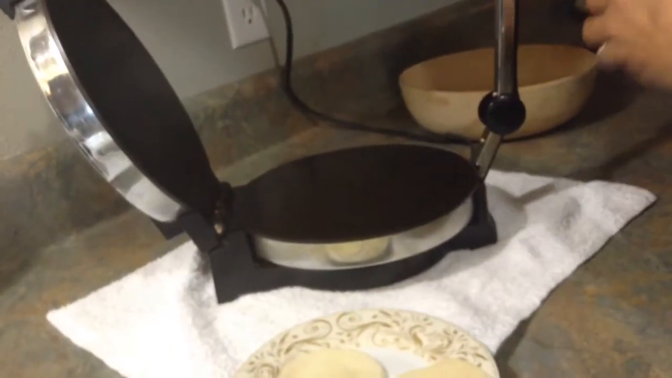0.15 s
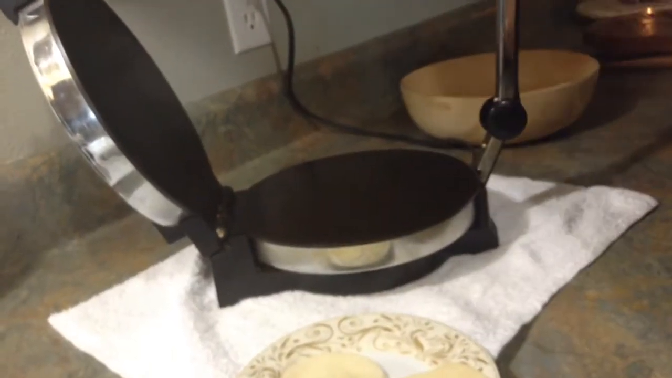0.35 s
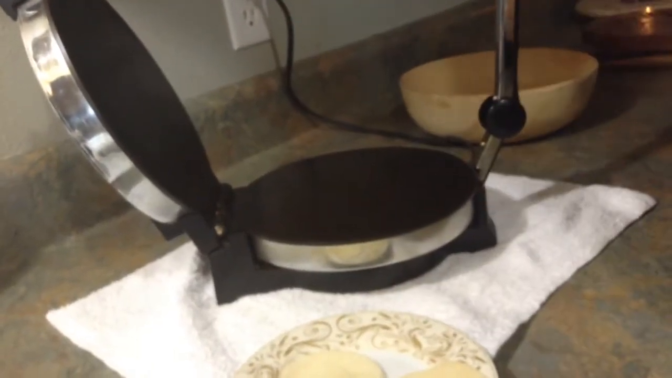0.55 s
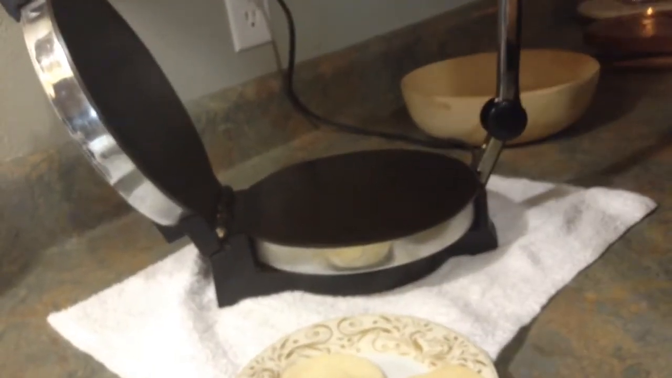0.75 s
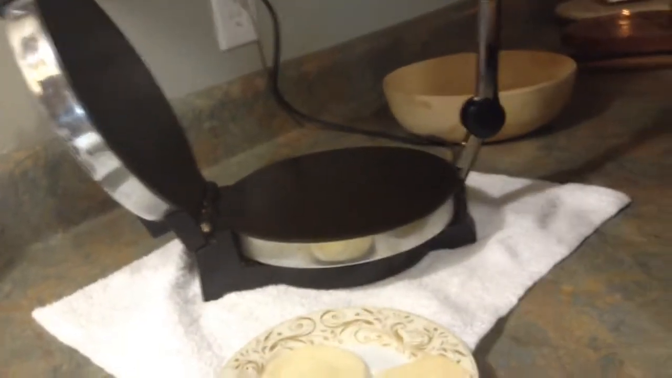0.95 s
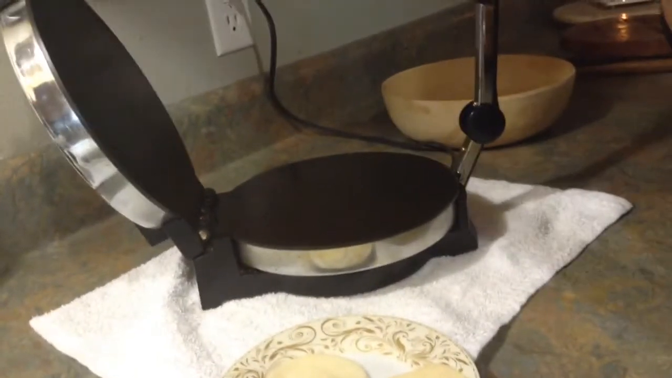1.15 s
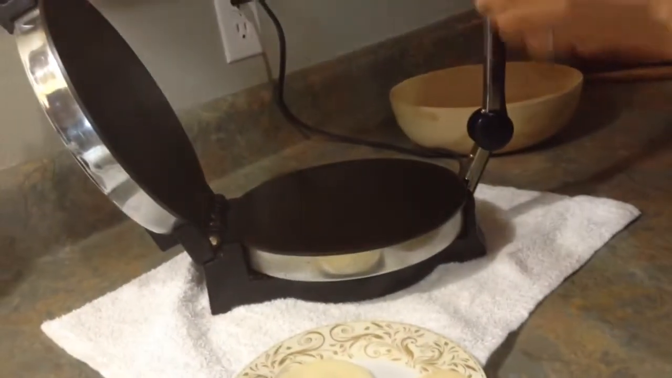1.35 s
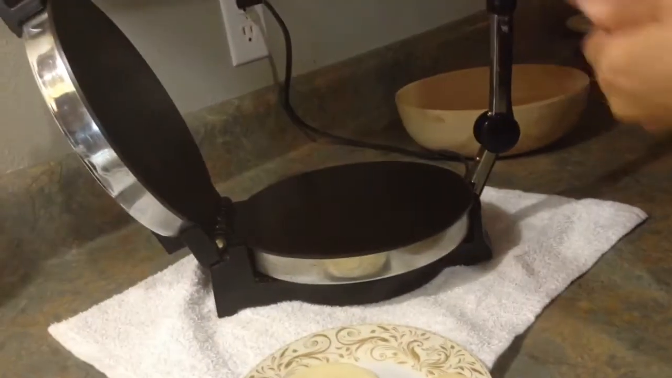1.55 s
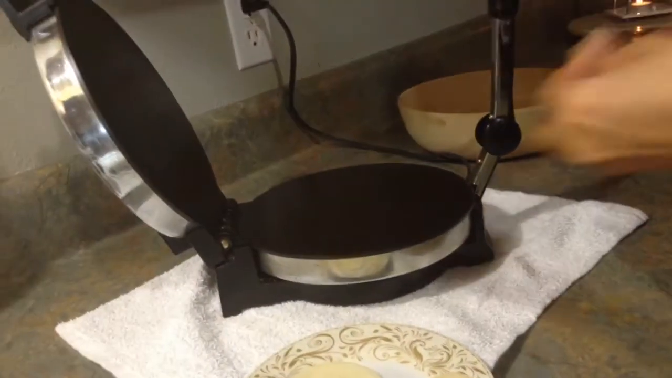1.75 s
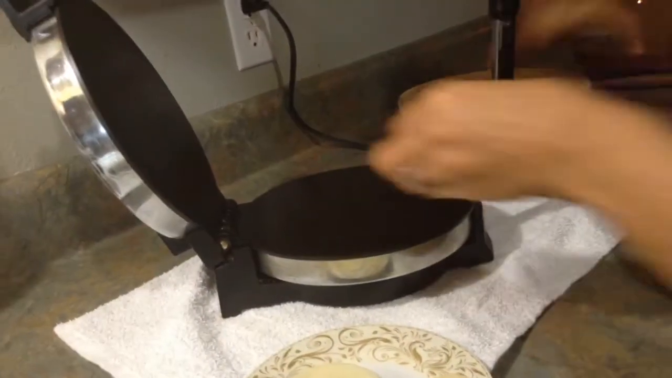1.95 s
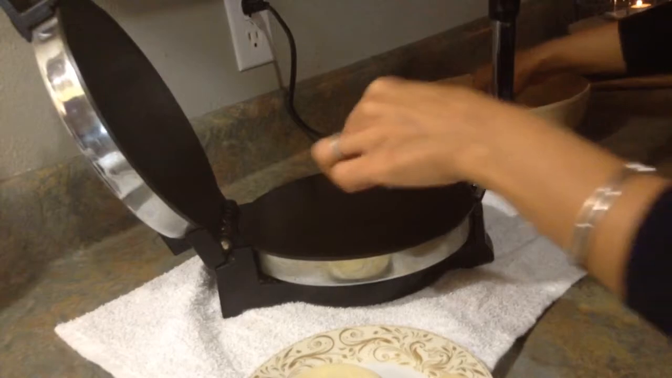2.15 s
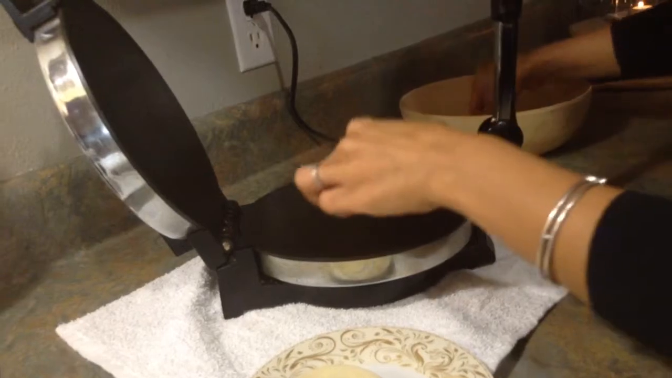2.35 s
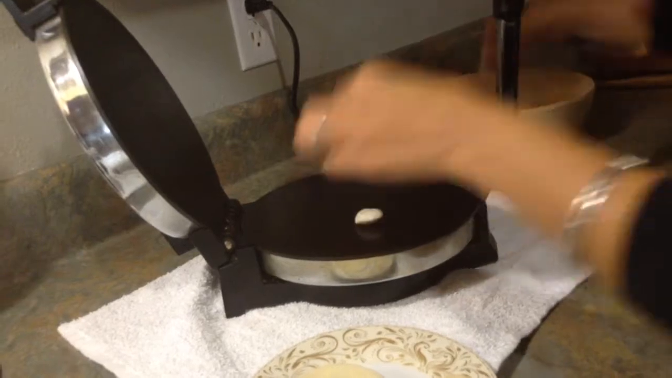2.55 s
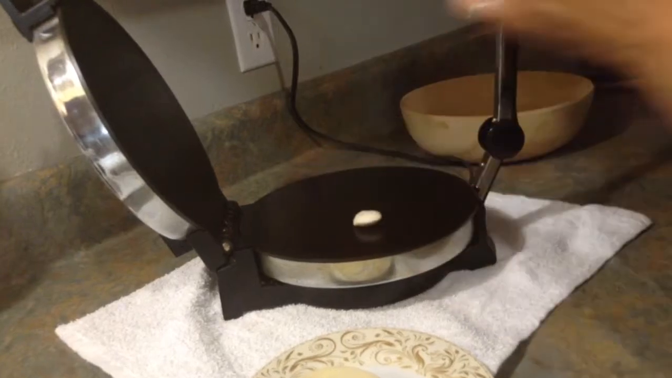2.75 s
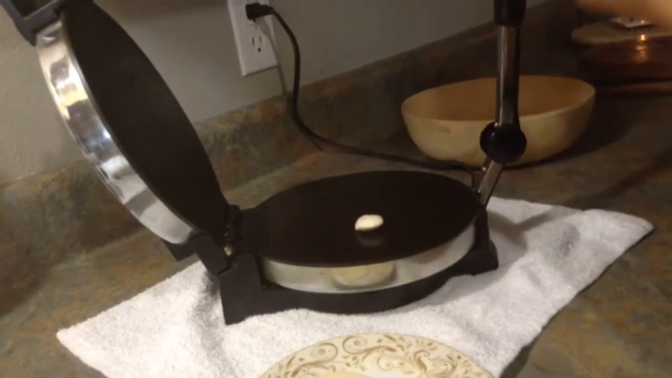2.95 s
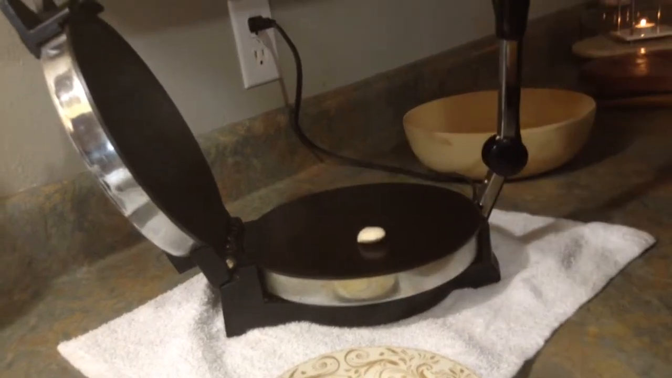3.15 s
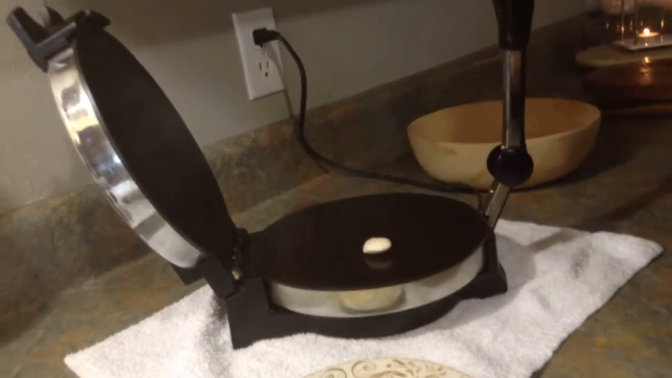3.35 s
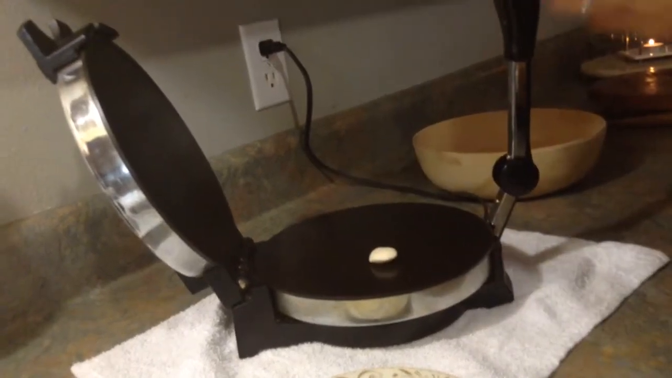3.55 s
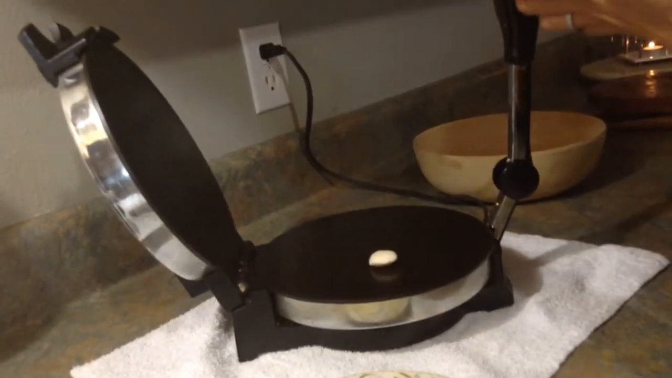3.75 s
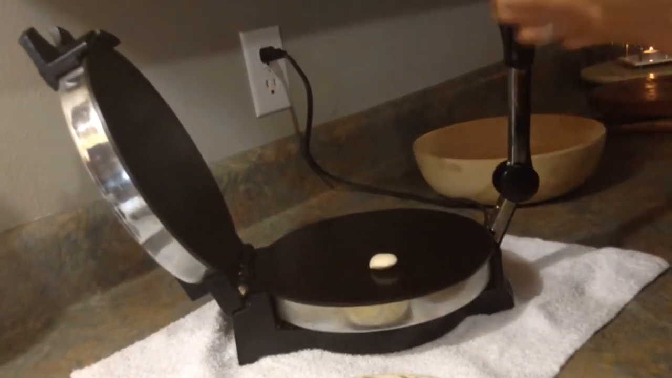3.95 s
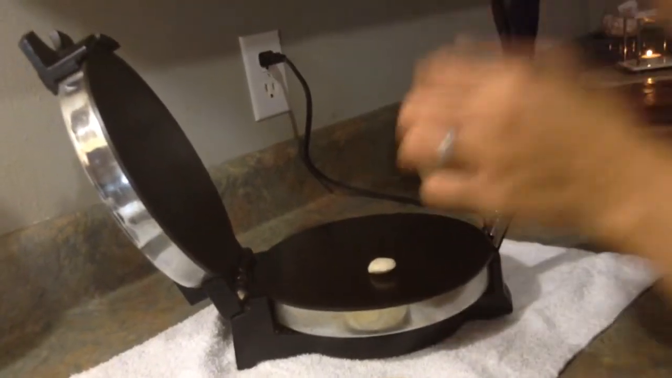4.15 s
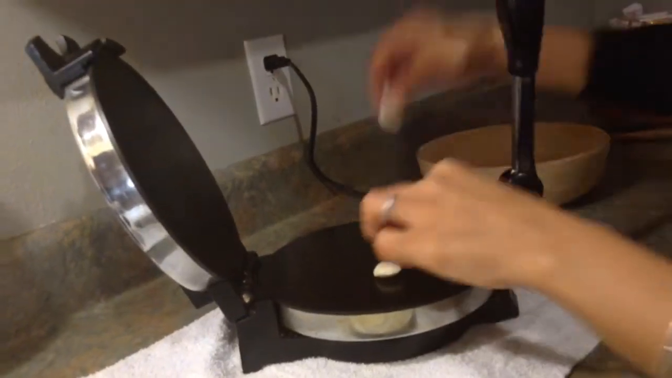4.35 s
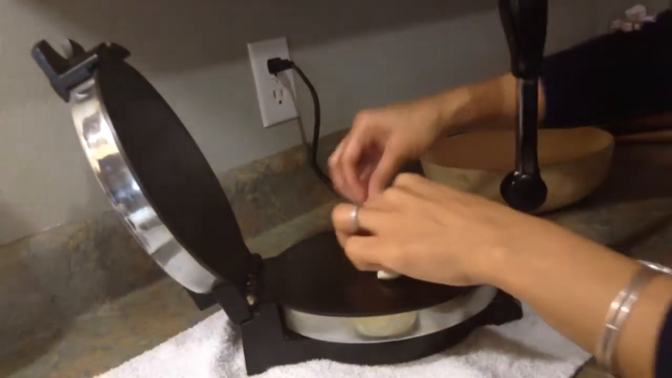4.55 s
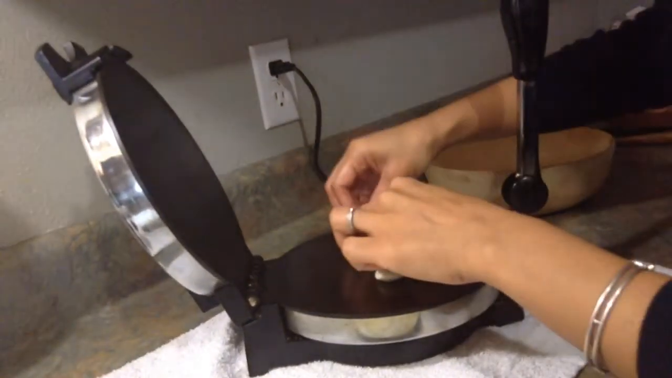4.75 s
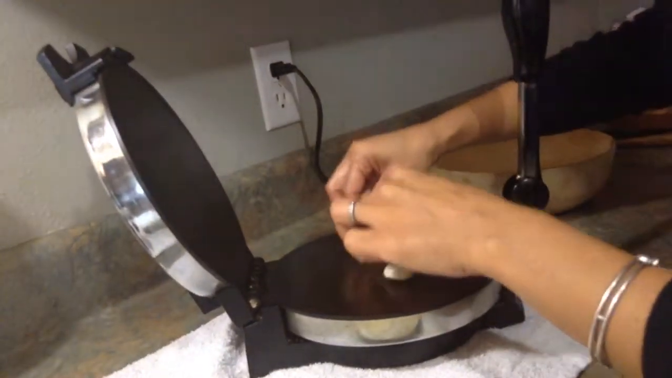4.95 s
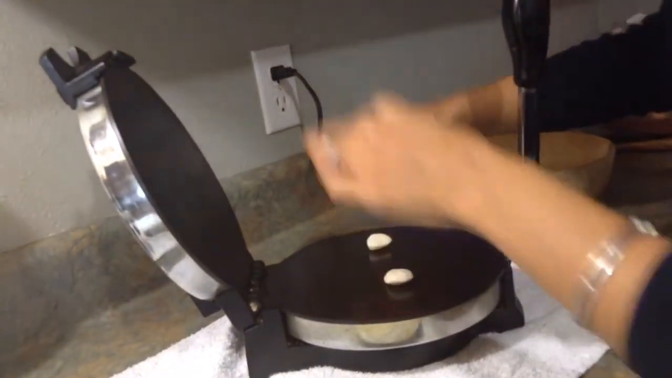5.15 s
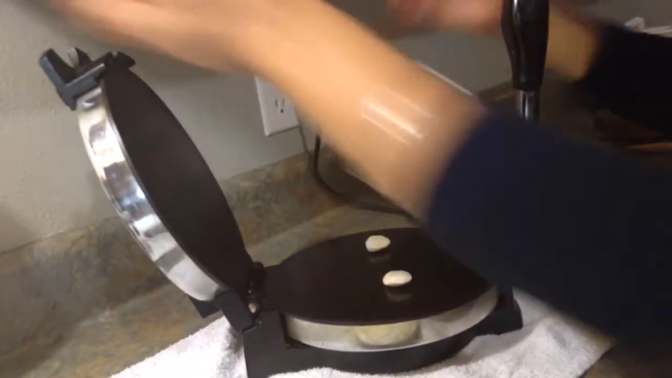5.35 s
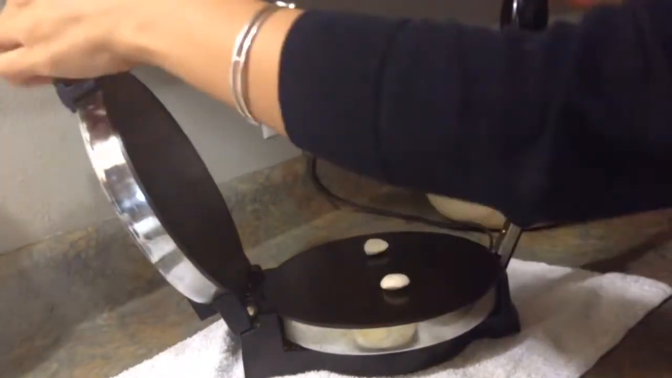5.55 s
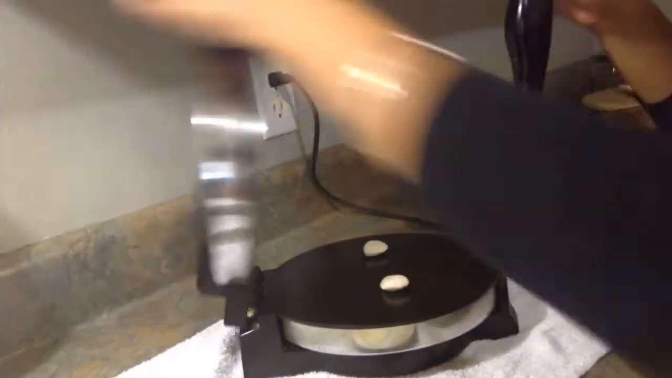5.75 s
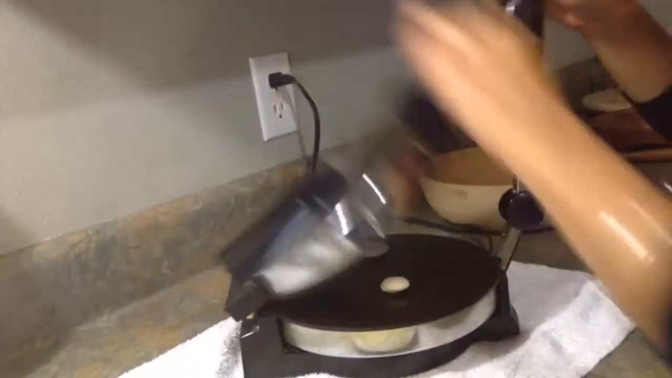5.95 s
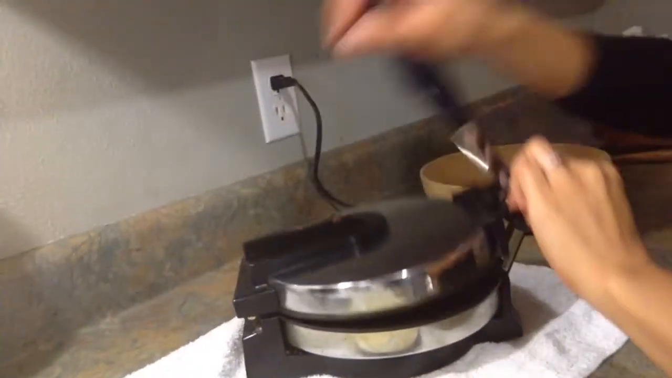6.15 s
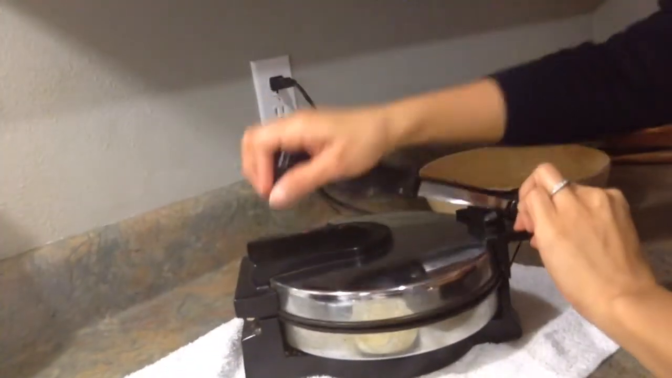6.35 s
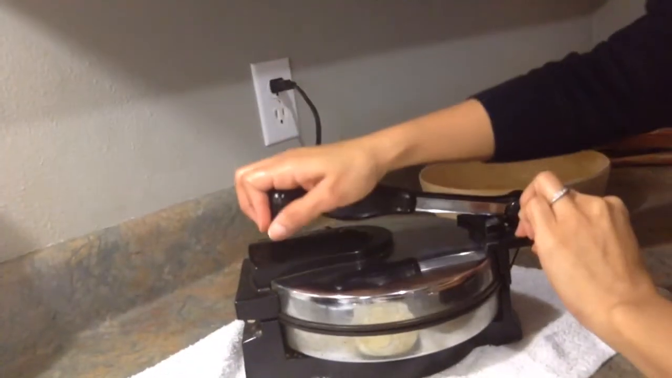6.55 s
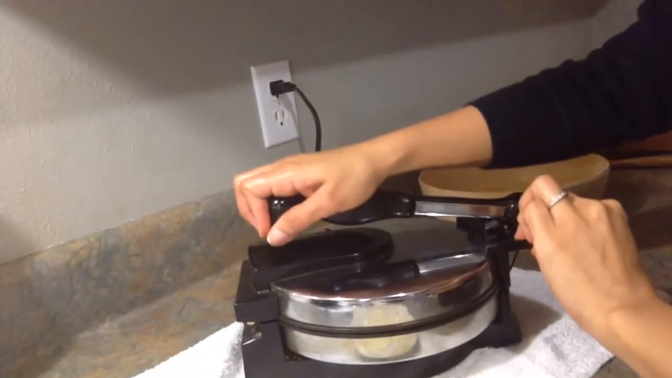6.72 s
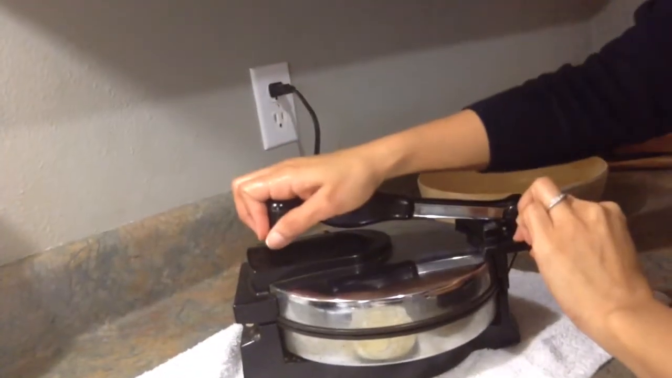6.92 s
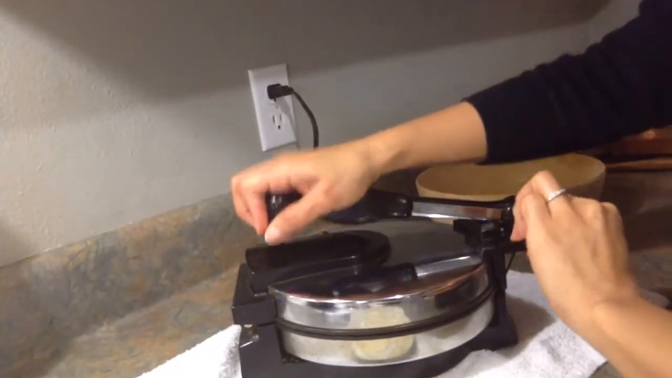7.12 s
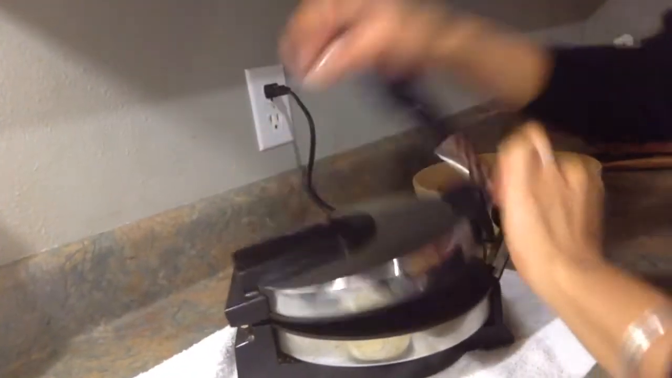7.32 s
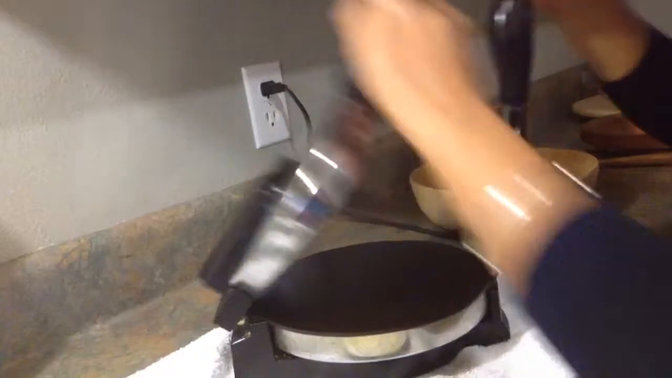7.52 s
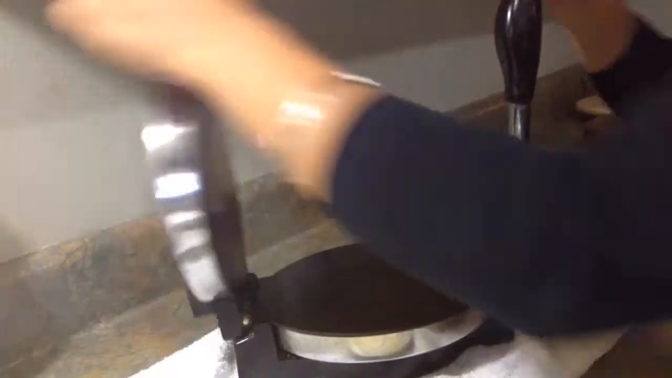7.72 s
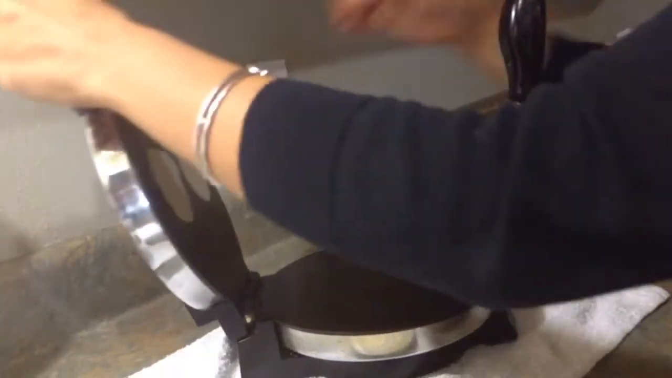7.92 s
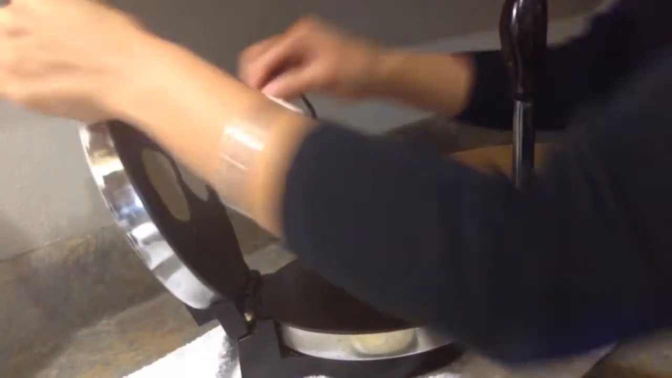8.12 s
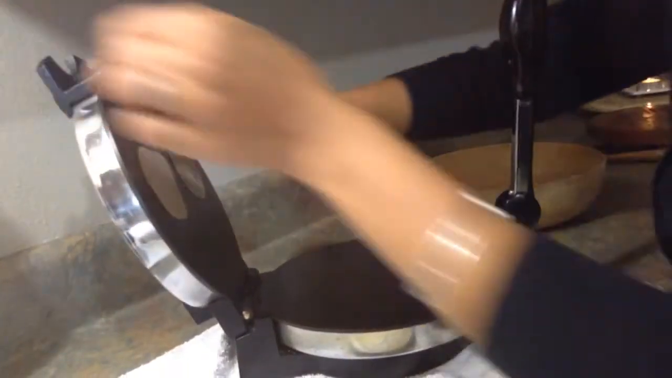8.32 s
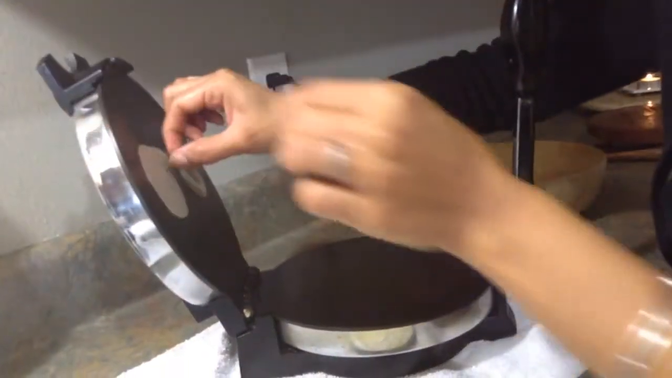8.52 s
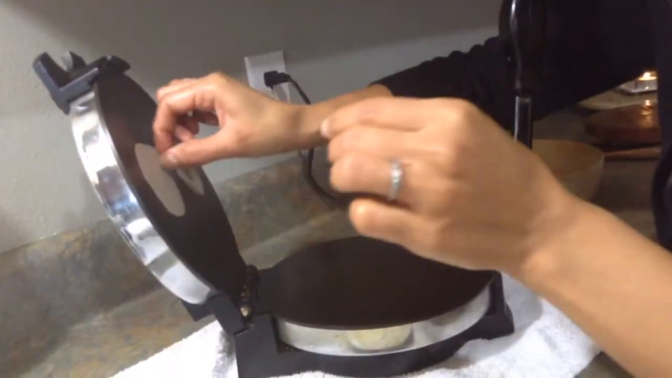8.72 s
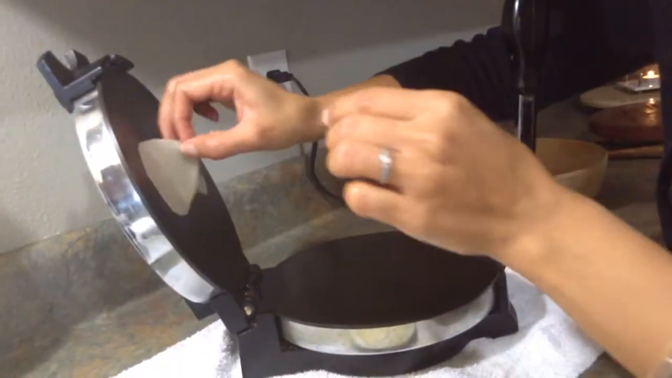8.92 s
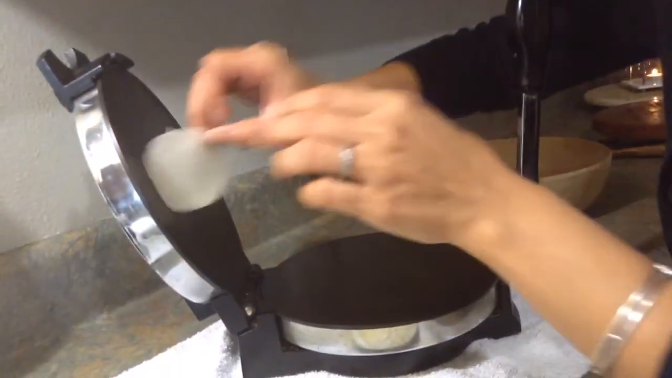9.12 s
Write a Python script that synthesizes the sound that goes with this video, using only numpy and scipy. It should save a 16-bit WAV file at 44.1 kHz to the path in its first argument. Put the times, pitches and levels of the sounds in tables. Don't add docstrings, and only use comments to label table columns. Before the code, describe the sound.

Palms roll dough with dry hissing strokes, then a hinged metal press clanks shut, its lever clicks, dough sizzles, and the lid knocks open.

```python
import sys
import numpy as np
from scipy import signal
from scipy.fft import rfft, irfft, next_fast_len
from scipy.io import wavfile
from scipy.ndimage import uniform_filter1d

SR = 44100
rng = np.random.default_rng(int(sys.argv[2]) if len(sys.argv) > 2 else 0)


def generate_wav(signal):
    frames = np.transpose(np.atleast_2d(signal))
    scaled = np.clip(frames, -1, 1) * 32767
    pcm = np.round(scaled).astype(np.int16)
    wavfile.write(sys.argv[1], SR, pcm)


def makeup_ratio(level_db):
    decades = np.asarray(level_db, float) / 20
    return 10 ** decades


N = 409233
T = np.arange(N) / SR

# (frequency [Hz], level [dB per Hz])
SKIN = [(880, 17), (1500, -2), (2530, -9.5), (3860, -5.5), (4520, -8), (5240, -14), (11000, -8),
        (12800, -6.5), (14900, -6), (15800, -6.5)]
# (frequency [Hz], level [dB], t60 factor [1])
PLATES = [(363.4, -14, 1.2), (460.6, -7.5, 1), (517, -14, 1.7), (607, -13, 1.5), (688, -12.5, 1.1),
          (758, -2.5, 2), (931, 3, 1.05), (1005, -2, 1.2), (1196, -12, 1.7), (1323, -5, 1.3),
          (1380, -0.5, 1.2), (1418, -1.5, 1.6), (1470, -4.5, 1.3), (1530, -8, 1.2), (1710, -14, 0.8),
          (1930, -10, .7), (2048, 1, 1.2), (2260, -7, 1.0), (2385, -4, .7), (2543, -7, 0.85),
          (2720, -1, .45), (3030, -12.5, .6), (3246, -10.5, 0.8), (3880, -16, 0.46), (4350, -14, .6)]


def evened(x):
    return x / np.sqrt(np.mean(x ** 2) + 1e-20)


def read(points, hz):
    f, value = np.transpose(points)
    return np.interp(np.log(hz + 1), np.log(f + 1), value)


def add(mix, s, sound):
    part = mix[round(s * SR):][:len(sound)]
    part += sound[:len(part)]


def curve(tables):
    s, *columns = np.transpose(sum(tables, []))
    inside = sum((T >= rows[0][0]) & (T < rows[-1][0] + 0.003) for rows in tables) > 0
    gate = uniform_filter1d(1. * inside, size=400)
    return [gate] + [np.interp(T, s, c) for c in columns]


def fade(t, t60):
    return np.exp(-np.log(1000) * t / t60)


def band(x, lo_hz, hi_hz):
    edges_hz = [lo_hz, min(hi_hz, SR / 2.1)]
    return signal.sosfilt(signal.butter(3, edges_hz, "band", fs=SR, output="sos"), x)


def resonate(x, hz, width):
    turn = np.exp(2j * np.pi * np.cumsum(hz * np.ones(len(x))) / SR)
    r = np.exp(-np.pi * width / SR)
    return 2 * (turn * signal.lfilter([1 - r], [1, -r], x / turn + 1e-18)).real


def hiss(spectrum, patchy_db, flicker_db):
    frames, hz = N // 128 + 5, np.fft.rfftfreq(512, 1 / SR)
    a, b, patches = rng.standard_normal((frames, 257, 3)).T
    patches = uniform_filter1d(patches, size=6, axis=0)
    patches = evened(uniform_filter1d(patches, size=12, axis=1))
    flicker = evened(uniform_filter1d(rng.standard_normal(frames), size=3))
    level_db = read(spectrum, hz)[:, None] + patchy_db * patches + flicker_db * flicker
    z = (a + 1j * b) * makeup_ratio(level_db)
    return evened(signal.istft(z, nperseg=512, noverlap=384)[1][:N])


def grit(per_s, spread_db):
    size = makeup_ratio(spread_db * np.minimum(rng.exponential(1, N), 5))
    sign = rng.choice([-1, 1], N)
    return evened(size * sign * (rng.random(N) < per_s / SR))


def burst(noise, lo_hz, hi_hz, t60):
    x = band(noise * fade(T[:len(noise)], t60), lo_hz, hi_hz)
    return x / abs(x).max()


def air():
    # (frequency [Hz], level [dB per Hz])
    room = [(29, -61), (60, -33), (95, -22), (134, -9), (188, -8), (257, -9), (300, -12), (530, -14),
            (837, -13), (2530, -20), (4410, -20), (13700, -21), (15800, -24)]
    # (time [s], level [dB])
    hum_levels = [
        (0, -80.5),
        (5.5, -77),
        (6.2, -89.5),
        (9.28, -95),
    ]
    room_db, hum_hz = -71.3, 240.5
    size = next_fast_len(N, True)
    hz = np.fft.rfftfreq(size, 1 / SR)
    tone = evened(irfft(rfft(rng.standard_normal(N), size) * makeup_ratio(read(room, hz)), size)[:N])
    drift, waver = (evened(uniform_filter1d(rng.standard_normal(N), size=n)) for n in (2500, 9000))
    crackle = evened(resonate(grit(per_s=40, spread_db=6), 6000, width=900))
    hum = np.sin(2 * np.pi * np.cumsum(hum_hz + 0.6 * waver) / SR)
    hum_db = np.interp(T, *np.transpose(hum_levels)) + 0.84 * waver
    return makeup_ratio(room_db + drift) * (tone + 0.057 * crackle) + np.sqrt(2) * makeup_ratio(hum_db) * hum


def kitchen(x):
    # (frequency [Hz], t60 [s])
    decay = [(150, 0.38), (500, .45), (1000, 0.47), (2000, 0.39), (4000, 0.23), (6500, 0.2), (12000, 0.29)]
    out = np.zeros(N)
    for k in range(3):
        taps = np.zeros(SR // 2)
        at = np.arange(250, len(taps) - 20, 20)
        taps[at + rng.integers(0, 20, len(at))] = rng.choice([-1., 1.], len(at))
        hz, t, z = signal.stft(taps, SR, nperseg=256)
        tail = signal.istft(z * makeup_ratio(-60 * t / read(decay, hz)[:, None]), SR, nperseg=256)[1]
        share = np.sqrt(2 / 3) * np.cos(2 * np.pi * 25 * T + k * np.pi / 3)
        out += signal.oaconvolve(share * x, tail / np.linalg.norm(tail))[:N]
    return out


def rocking():
    # (time [s], level [dB])
    shakes = [(4.0, -83), (5.59, -72.5), (5.72, -67), (6.0, -82), (6.43, -70.5), (6.72, -78.5), (7.2, -66),
              (7.36, -65), (9.27, -67.5)]
    lumps_db = np.interp(T, *np.transpose(shakes), left=-120)
    deep_db = np.interp(T, (5.3, 7.6), (-103, -75.5))
    noise = rng.standard_normal(N)
    lumps = resonate(noise, 150, width=16) + 0.65 * resonate(noise, 180.6, width=12.1)
    deep = resonate(resonate(noise, 76, width=10), 76, width=10)
    return makeup_ratio(lumps_db) * evened(band(lumps, 101.4, 300)) + makeup_ratio(deep_db) * evened(deep)


def thump(s, peak_db, hz, t60):
    t = T[:SR // 2]
    ring = np.sin(2 * np.pi * hz * t)
    ring += 0.4 * np.sin(2 * np.pi * hz * 0.66 * t)
    ring += 0.3 * np.sin(2 * np.pi * hz * 1.87 * t)
    rise = 1 - np.exp(-t / 0.004)
    return s, band(makeup_ratio(peak_db - 60 * t / t60) * rise * ring, 115, 900)


def bangle():
    # (frequency [Hz], level [dB], t60 [s], unused as the rattle sets the decay)
    modes = [(2230, -8, 0.076), (2620, -9, 5.0), (2940, -7, 1.2), (3470, -6, 0.33), (4590, -0.5, 0.42),
             (5400, -17, 0.077)]
    start_s, level_db, rattle_t60_s = 2.283, -51.5, 0.092
    t = T[:SR // 3]
    rattle = rng.standard_normal(len(t)) * makeup_ratio(-60 * t / rattle_t60_s)
    lines = sum(makeup_ratio(db) * evened(resonate(rattle, hz, width=70)) for hz, db, _ in modes)
    return start_s, makeup_ratio(level_db - 20.0) * lines


def bowl(s, peak_db):
    # (frequency [Hz], level [dB], t60 [s])
    modes = [(970, 1, 0.07), (1263, 3, 0.085), (1614, 7, 0.045), (1850, -18, 0.046), (2480, -6, .04),
             (2570, 2.5, 0.028), (3360, -17, .03)]
    t, noise = T[:SR // 5], rng.standard_normal(SR // 5)
    ring = sum(makeup_ratio(db - 60 * t / t60) * np.sin(2 * np.pi * hz * t) for hz, db, t60 in modes)
    ring = band(ring, 600, 4000)
    return s, makeup_ratio(peak_db) * (ring / abs(ring).max() + 0.59 * burst(noise, 1030, 3130, 0.11))


def tick(s, peak_db, hz, crack_db, t60):
    noise = rng.standard_normal(SR // 5)
    near = burst(noise, hz / 1.2, hz * 1.2, t60)
    wide = burst(noise, hz / 2.2, hz * 2.2, 0.6 * t60)
    crack = burst(noise, 5200, 24300, 0.39 * t60)
    return s, makeup_ratio(peak_db) * (0.5 * near + wide + makeup_ratio(crack_db + 8) * crack)


def snap(s, peak_db, lo_hz):
    return s, makeup_ratio(peak_db) * burst(rng.standard_normal(SR // 20), lo_hz, 18000, 0.0052)


def whistle(s, db, hz, width, half):
    t = np.arange(-3 * half, 3 * half, 1 / SR)
    pitch_hz = np.interp(t, (-1.5 * half, 1.5 * half), hz)
    fuzz = resonate(resonate(rng.standard_normal(len(t)), pitch_hz, width), pitch_hz, 2 * width)
    return s - 3 * half, makeup_ratio(db) * np.exp(-(t / half) ** 2) * evened(fuzz)


def squeak(s, db, hz, width, half):
    return whistle(s, db, (hz, hz), width, half)


def glide(s, db, from_hz, to_hz, half):
    return whistle(s, db, (from_hz, to_hz), 0.2 * (from_hz + to_hz) / 2, half)


def brushes():
    # (time [s], hiss level [dB], body level [dB], half length [s])
    strokes = [(0.322, -59.5, -68, 0.047), (1.028, -61.5, -70.5, 0.028), (1.112, -59.5, -72.5, 0.031),
               (1.275, -63, -97, 0.028), (1.57, -69, -69.5, 0.045), (2.288, -62, -73, 0.01),
               (2.857, -63, -69, 0.036), (2.907, -54.5, -72, 0.027), (3.018, -65, -68.5, 0.073),
               (3.59, -57, -66, 0.038), (3.687, -60, -75, 0.042), (3.841, -56.5, -73, 0.05),
               (4.102, -67, -78, 0.031), (4.651, -66, -74, 0.018), (4.81, -58, -71, 0.011),
               (4.88, -74, -74, 0.012), (5.327, -70.5, -76, 0.18), (8.872, -73, -68.5, 0.037),
               (9.066, -67.5, -58.5, 0.034)]
    slide, out = hiss(SKIN, patchy_db=2.0, flicker_db=2.5), np.zeros(N)
    top, body = evened(band(slide, 5600, 23000)), evened(band(slide, 1850, 5670))
    for s, hiss_db, body_db, half in strokes:
        at = slice(max(round((s - 3 * half) * SR), 0), round((s + 3 * half) * SR))
        swell = np.exp(-((T[at] - s) / half) ** 2)
        out[at] += swell * (makeup_ratio(hiss_db) * top[at] + makeup_ratio(body_db) * body[at])
    return out


def palms():
    # (time [s], pressure level [dB], palm cavity [Hz])
    rolls = [
        [(0.45, -81, 2860), (0.51, -41, 4553), (0.556, -40, 5200), (0.63, -38, 4840), (0.674, -35, 3920),
         (0.774, -41, 4690), (0.824, -35, 4590), (0.862, -48, 3570), (0.95, -74, 4260)],
        [(3.04, -60, 4190), (3.064, -55, 4930), (3.074, -43, 4970), (3.18, -36.5, 5300), (3.236, -37.5, 4060),
         (3.318, -44.5, 4530), (3.368, -40.5, 3950), (3.414, -43.5, 4510), (3.5, -70.5, 4270)],
    ]
    cup_db, cup_db_per_octave, cup_hz = -19, -12, 4700
    on, hiss_db, cavity_hz = curve(rolls)
    body_db = hiss_db + cup_db + cup_db_per_octave * np.log2(cavity_hz / cup_hz)
    slide = hiss(SKIN, patchy_db=1.8, flicker_db=0.7) + 0.1 * grit(per_s=4000, spread_db=1.2)
    cavity = resonate(rng.standard_normal(N), cavity_hz, width=650)
    cavity = resonate(cavity, cavity_hz, width=1600)
    body = 0.89 * evened(band(band(slide, 3060, 5450), 1800, 9300))
    body += 0.99 * evened(band(cavity, 2160, 9000))
    return on * (makeup_ratio(hiss_db) * evened(band(slide, 4930, 15000)) + makeup_ratio(body_db) * evened(body))


def sizzle():
    # (frequency [Hz], level [dB per Hz])
    steam = [(1470, -18.5), (2500, -12.5), (2870, -2), (4190, 3), (4930, -1), (6360, -5.5), (7770, 0),
             (9350, -6), (11000, -7), (11600, -22), (12400, -14), (13000, -4), (14600, -5.5), (15400, -12),
             (15800, -19)]
    start_s, build_s, lift_s = 6.15, 0.22, 7.28
    start_db, build_db, thin_db_per_s, stop_db_per_s = -53.5, -5, -12, -110
    t = T - start_s
    level_db = start_db + build_db * np.clip(1 - t / build_s, 0, 1)
    level_db += thin_db_per_s * np.maximum(t - build_s, 0)
    level_db += stop_db_per_s * np.maximum(T - lift_s, 0)
    pops = evened(band(grit(per_s=600, spread_db=4), 2500, 10500))
    leak = evened(hiss(steam, patchy_db=2.0, flicker_db=1.8) + 0.22 * pops)
    return np.clip(t / 0.012, 0, 1) * makeup_ratio(level_db) * leak


def hinge():
    # (time [s], length [s], rub level [dB], bright part relative level [dB])
    swings = [(5.522, 0.48, -69.5, 1.5), (6.259, 0.54, -61.5, -4), (6.972, 0.537, -65.5, 3.5),
              (7.269, 0.47, -67.5, -4), (7.871, 0.437, -66.5, -10.5), (8.6, 1, -74, -12.5)]
    rest = (8.18, 0.5, -72, -10)
    push_s, slow_db, halt_s = 0.065, -1.5, 0.017
    slips = (rng.standard_normal(N) + 0.3 * grit(per_s=900, spread_db=3))[:SR]
    plates = sum(makeup_ratio(0.88 * db) * resonate(slips, hz, width=220) for hz, db, _ in PLATES)
    body, bright = evened(band(plates, 340, 1800)), evened(band(plates, 1900, 5200))
    out, t = np.zeros(N), T[:SR]
    for start, length, rub_db, bright_db in swings + [rest]:
        speed = np.clip(t / push_s, 0, 1) * makeup_ratio(slow_db * t / length)
        speed = speed * np.clip((length - t) / halt_s, 0, 1)
        rub = np.roll(body + makeup_ratio(bright_db) * bright, rng.integers(SR))
        add(out, start, makeup_ratio(rub_db) * speed * rub)
    return out


def creak(s, peak_db, lo_hz):
    noise = rng.standard_normal((2, SR // 20))
    click = 1.1 * burst(noise[0], lo_hz, 18000, 0.002) + 0.12 * burst(noise[1], lo_hz, 15800, 0.028)
    return s, makeup_ratio(peak_db) * (click - resonate(click, 11700, width=900))


def blow(s, peak_db, body_db, edge_db, crack_db, t60, rings=0.59, luck_db=2.2, crack_hz=9000, thud_hz=430):
    linger_db, linger = -27, 3.5
    clatter_db, clatter = -21, 4.5
    t, noise = T[:SR // 5], rng.standard_normal(SR // 5)
    ring = np.zeros(len(t))
    for (hz, db, k), (a, b, c, d) in zip(PLATES, rng.standard_normal((len(PLATES), 4))):
        decay = fade(t, t60 * k) + makeup_ratio(linger_db) * fade(t, linger * t60 * k)
        mode = np.sin(2 * np.pi * hz * t + 0.3 * b)
        twin = 0.3 * np.sin(2 * np.pi * hz * (1 + 0.04 * c) * t + d)
        ring += makeup_ratio(db + luck_db * a) * decay * (mode + twin)
    ring *= 1 - np.exp(-t / 0.00071)
    low, high = band(ring, 0.7 * thud_hz, 1750), band(ring, 1750, 5200)
    knock_top_hz = np.interp(peak_db + edge_db, (-55.5, -24.5), (3400, 4300))
    thud = burst(noise, thud_hz, 1800, t60)
    knock = burst(noise, 1800, knock_top_hz, 0.8 * t60)
    crack = burst(noise, 5000, crack_hz, 0.6 * t60)
    crack = crack - resonate(crack, 11500, width=2000)
    rattle = burst(noise[::-1], 1.4 * thud_hz, 2600, clatter * t60)
    body = rings * low / abs(low).max() + 0.5 * thud + makeup_ratio(clatter_db) * rattle
    edge = 0.82 * rings * high / abs(high).max() + 0.59 * knock
    sound = makeup_ratio(body_db) * body + makeup_ratio(edge_db) * edge + makeup_ratio(crack_db - 0.5) * crack
    return s, makeup_ratio(peak_db + 11.5) * sound


def slip(s, level_db, body_db, crack_db):
    return blow(s, level_db, body_db, 0, crack_db, t60=0.046, rings=0.26, luck_db=4.5,
                crack_hz=15500, thud_hz=720)


def clank(s, level_db, edge_db, crack_db, t60):
    return blow(s, level_db, 0, edge_db, crack_db, t60)


def scene():
    # (time [s], peak level [dB], pitch [Hz], t60 [s])
    thumps = [(0.638, -50, 420, 0.025), (2.253, -57.5, 166.4, 0.086), (5.528, -45, 189.5, 0.085),
              (5.572, -46.5, 157, 0.17), (5.621, -52, 135, 0.12), (5.847, -60, 153, 0.2),
              (6.239, -34.5, 249, 0.11), (7.203, -33.5, 241, 0.046), (7.372, -38.5, 160, 0.11),
              (7.397, -56, 162, 0.12), (7.515, -44, 232, 0.11), (7.878, -31, 165, 0.048),
              (7.937, -56, 188, 0.11), (9.172, -55, 170, 0.17), (9.247, -49, 190, 0.1)]
    # (time [s], peak level [dB])
    knuckles = [(0.466, -42.5), (1.742, -47), (2.809, -49), (3.828, -50.5), (4.822, -52.5)]
    # (time [s], peak level [dB], pitch [Hz], crack relative level [dB], t60 [s])
    ticks = [(0.227, -60, 7300, -11, 0.087), (0.64, -46.5, 2200, -20, 0.02), (3.855, -53, 4560, 5, 0.0097),
             (1.589, -47.5, 3950, -13, 0.038), (1.597, -51, 2100, -20, 0.036), (1.649, -61, 5940, -6, 0.05),
             (2.259, -50.5, 815, -35, 0.12), (2.283, -49.5, 1070, -25, 0.18),
             (2.753, -54.5, 3470, 6, 0.049), (2.856, -37, 4340, -7.5, 0.028),
             (3.053, -43, 2440, -14, 0.067), (3.073, -38, 7600, -8, 0.03), (3.171, -43, 5390, -12, 0.055),
             (4.185, -61, 3140, 5.5, 0.035), (4.547, -57, 7540, 10.5, 0.024),
             (5.357, -55, 1300, -22, 0.024), (9.055, -62, 3640, -13, 0.038), (9.126, -48, 2080, -25, 0.025),
             (9.082, -49, 3500, -14, 0.014), (3.012, -59, 4000, -3, 0.012)]
    # (time [s], peak level [dB], lowest frequency [Hz])
    snaps = [(2.708, -51, 2500), (4.607, -56, 6000), (4.646, -47, 7000), (4.652, -48, 6000),
             (4.803, -53, 6000), (4.809, -37, 5000), (4.878, -48, 2500), (5.357, -46, 1000),
             (2.856, -38, 1500), (3.073, -40, 5000), (3.172, -42, 2500)]
    # (time [s], level [dB], pitch [Hz],
    # width [Hz], half length [s])
    squeaks = [(.567, -49, 5450, 390, 0.014), (.634, -48.5, 5250, 400, 0.014),
               (0.83, -60, 5340, 300, 0.012), (3.862, -70, 2900, 150, 0.011), (3.864, -73, 4440, 208, .012),
               (4.05, -75, 4500, 200, 0.0092), (4.467, -74, 2820, 250, 0.014),
               (4.465, -73.5, 4450, 324.1, .016), (2.752, -69, 3580, 900, .012),
               (0.568, -59.5, 1620, 340, 0.023), (0.641, -58, 750, 400, 0.0038),
               (0.692, -50, 3900, 300, 0.012), (3.11, -63, 1500, 260, 0.022),
               (3.155, -64, 1620, 260, 0.018), (6.87, -70, 469, 90, .06), (1.262, -54, 12100, 700, 0.013),
               (6.933, -43, 6520, 60, 0.0044), (6.185, -66, 1330, 200, 0.025),
               (6.168, -63, 2150, 350, 0.014), (6.198, -58, 2250, 400, 0.012),
               (6.231, -66, 300, 200, 0.004), (7.07, -51, 1013, 64.8, 0.0068),
               (7.083, -45, 3400, 198, 0.0047), (7.41, -47, 755, 90, 0.013), (7.44, -58, 750, 90, 0.02),
               (7.53, -59, 730, 110, .04)]
    # (time [s], level [dB], start pitch [Hz], end pitch [Hz], half length [s])
    glides = [(0.677, -50, 3200, 4000, 0.02), (0.795, -57, 3300, 2000, 0.014),
              (0.82, -59, 2000, 2100, 0.015), (0.855, -63, 2000, 1100, 0.012),
              (3.24, -56, 3900, 3100, 0.015), (3.365, -55, 3600, 2000, 0.02), (3.4, -64, 1800, 1000, 0.015),
              (3.175, -58, 3600, 2600, 0.01), (3.23, -50, 6100, 6600, 0.045),
              (3.13, -53, 5200, 5400, 0.015), (3.097, -52, 7100, 6800, 0.01)]
    # (time [s], peak level [dB], lowest frequency [Hz])
    creaks = [(6.655, -45, 2500), (6.702, -45, 3000), (6.871, -23, 3000), (6.898, -29.5, 2500),
              (6.916, -24.5, 2500), (6.929, -26.5, 3000), (6.963, -38, 3000)]
    # (time [s], edge level [dB], body relative level [dB], crack relative level [dB])
    slips = [(6.17, -60, -34, 3), (6.381, -39, -11, 7), (6.634, -36.5, -5.5, 0), (6.693, -48.5, 1.5, -27),
             (6.723, -56, 4, -20), (6.73, -57, 4, -20), (6.739, -51.5, -8, 9), (6.804, -35, -3, 3.2),
             (6.847, -33.5, -3.5, -3), (7.068, -46, -11, -5.5)]
    # (time [s], body level [dB], edge relative [dB], crack relative [dB], ring t60 [s])
    blows = [(5.528, -52, -9, -31, 0.075), (5.57, -52, -4.5, -27, 0.088), (5.619, -54, -8, -37, .055),
             (5.737, -74.5, 13.5, -6, 0.052), (5.837, -61, 3, -3, 0.054), (5.872, -77, 11, -12, 0.054),
             (6.238, -26, 5.5, -16, 0.038), (6.2424, -30.5, -3, -22, 0.036), (6.2495, -34, -6, -20, 0.045),
             (6.2545, -37, -6, -28, 0.04), (6.268, -49, -3, -18, 0.05), (6.281, -51, -2, -16, 0.05),
             (6.296, -57, 2, -13, .05), (7.08, -50, -2.5, -2.5, 0.19), (7.134, -47, -4, -12, 0.042),
             (7.204, -31, 0.5, -17.5, 0.035), (7.2072, -32, -3, -19, 0.042), (7.219, -45, 0, -20, 0.04),
             (7.229, -46, 0, -20, 0.04), (7.262, -52, 2, -12, 0.04), (7.273, -54, 3, -8, 0.05),
             (7.365, -51.5, 6.5, 1, 0.041), (7.391, -46.5, 4.5, -10, 0.048),
             (7.509, -53.5, 5.5, -20, 0.029), (7.718, -65, 0.5, -14, 0.098),
             (7.878, -55.5, -21, -36, 0.065), (7.935, -58, 2, -14.5, 0.059), (7.985, -62, -9, -21, 0.031),
             (8.097, -64.5, 7, -19, 0.053), (8.139, -55, 3, -25, 0.06)]
    knocks, whistles = np.zeros((2, N))
    add(knocks, *bangle())
    add(whistles, *squeak(6.262, -62, 80, width=60, half=0.031))
    for source, rows in ((thump, thumps), (bowl, knuckles), (tick, ticks), (snap, snaps),
                         (creak, creaks), (slip, slips), (clank, blows)):
        for row in rows:
            add(knocks, *source(*row))
    for source, rows in ((squeak, squeaks), (glide, glides)):
        for row in rows:
            add(whistles, *source(*row))
    steady = air() + rocking() + brushes() + palms() + sizzle() + hinge() + whistles
    mono = knocks + makeup_ratio(-8.0) * kitchen(knocks + 0.78 * whistles) + steady
    return np.array([mono, mono])


def low_pass(x):
    return signal.sosfilt(signal.butter(12, 16450, fs=SR, output="sos"), x)


def record(dry):
    dry = signal.sosfilt(signal.butter(2, 40, "high", fs=SR, output="sos"), dry)
    edge = signal.firwin(511, 15480, window=("kaiser", 7), fs=SR)
    mix = signal.oaconvolve(dry, edge[None], "same")
    return low_pass(mix)


dry = scene()
out = record(dry)
generate_wav(out)
```